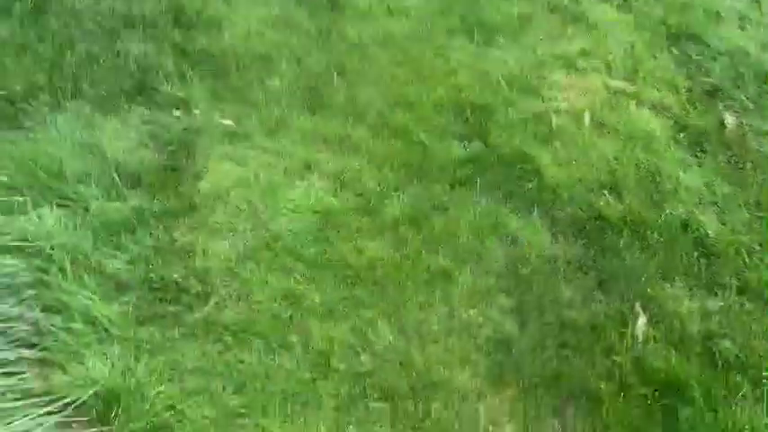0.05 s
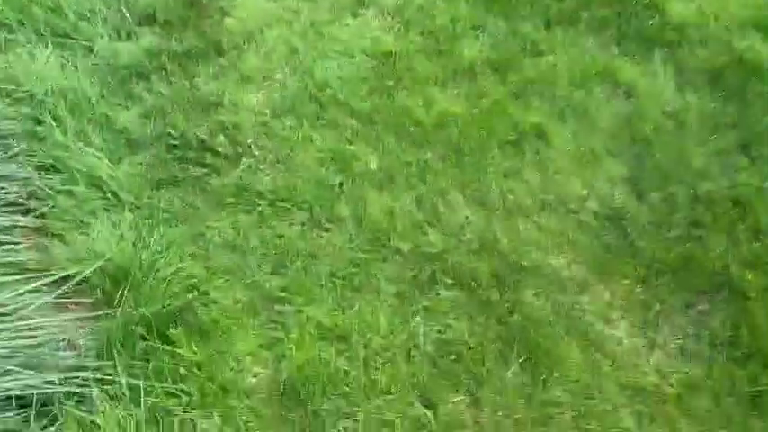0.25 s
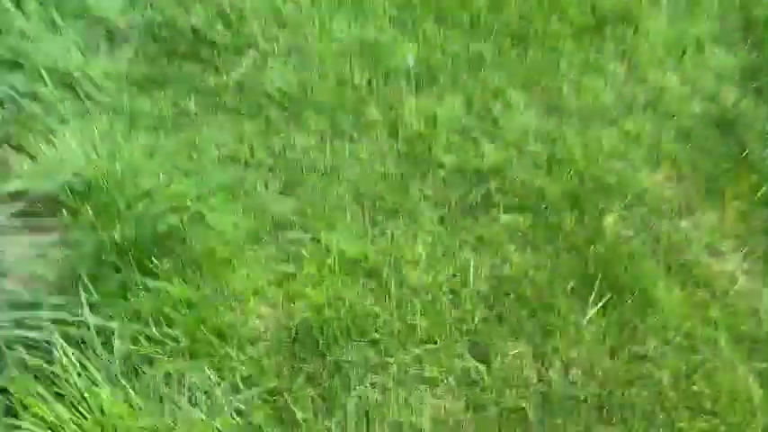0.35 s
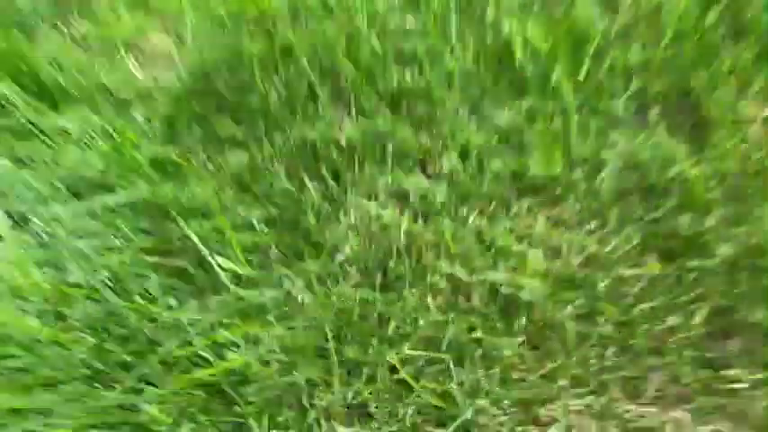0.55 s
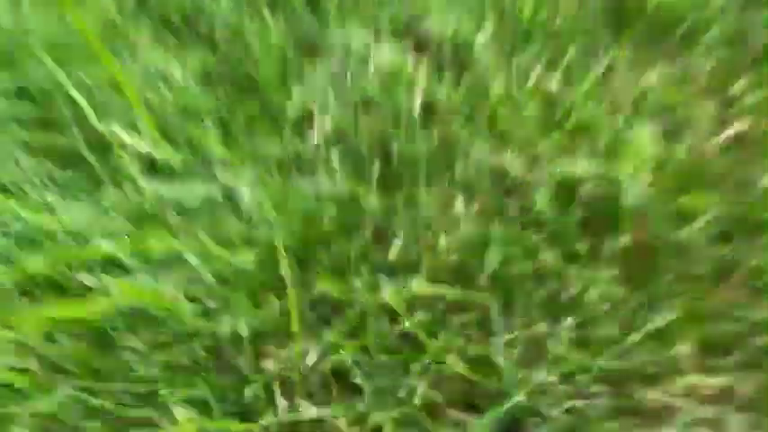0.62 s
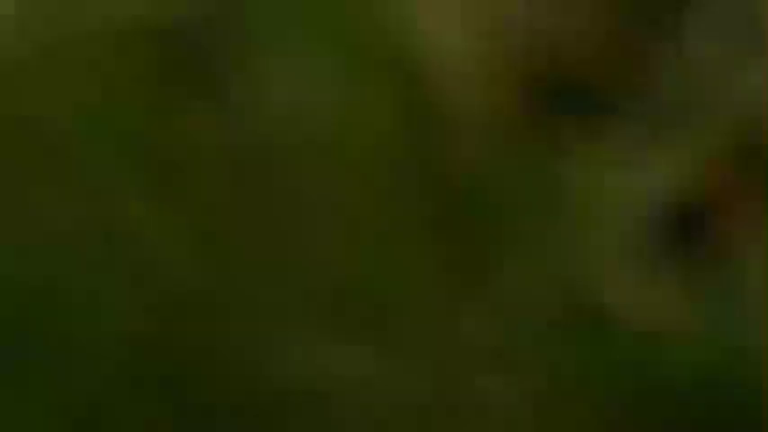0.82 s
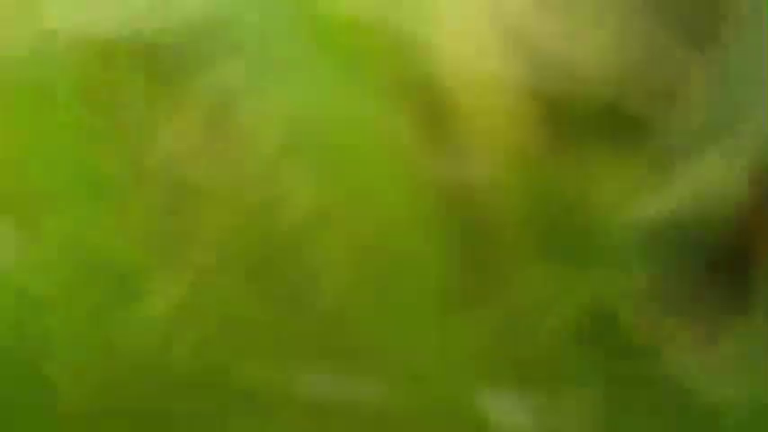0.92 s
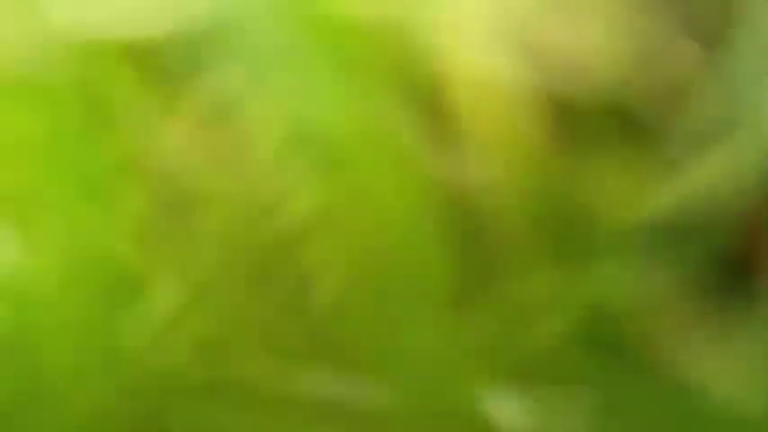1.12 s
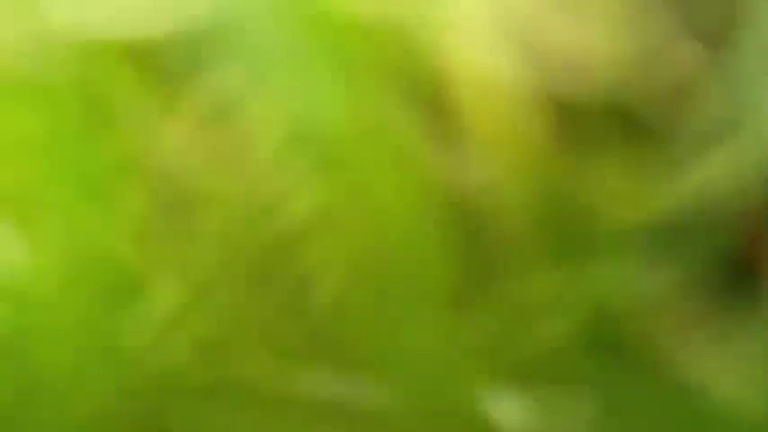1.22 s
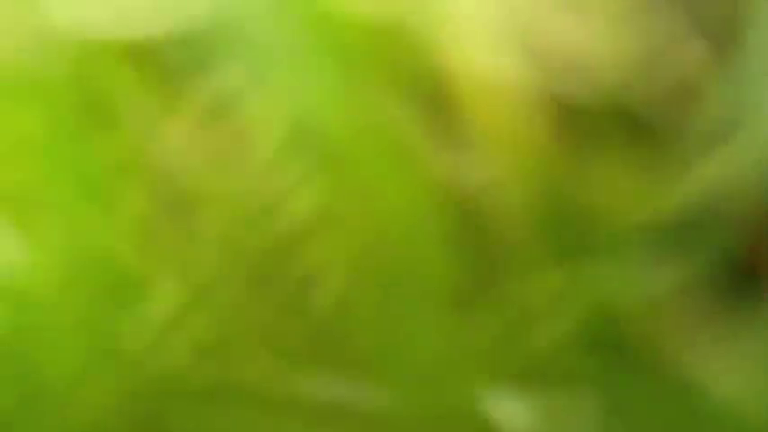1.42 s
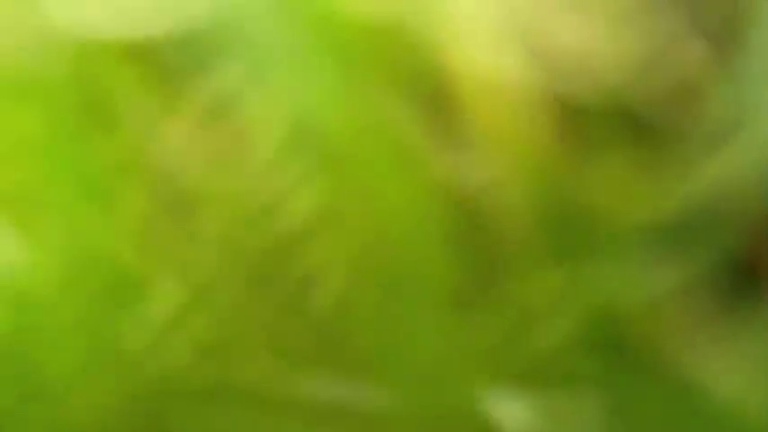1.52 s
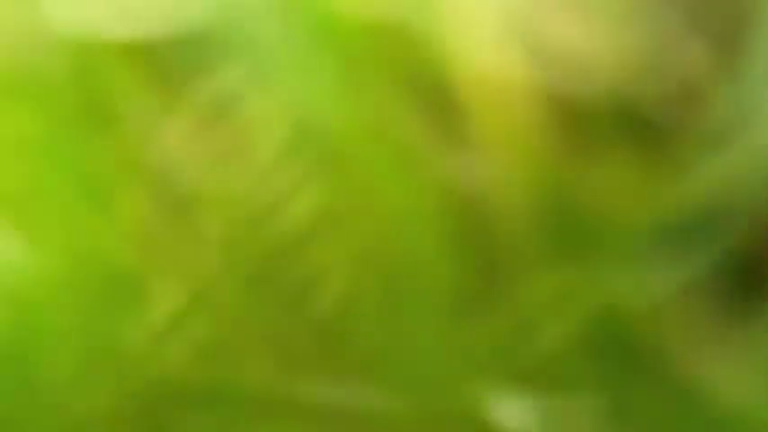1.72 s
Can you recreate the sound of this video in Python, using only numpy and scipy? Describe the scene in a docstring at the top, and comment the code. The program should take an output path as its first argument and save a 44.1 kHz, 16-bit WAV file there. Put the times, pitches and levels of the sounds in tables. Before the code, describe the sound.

A small camera thuds onto a lawn. Low wind buffets its microphone as it falls, then grass swishes, stems crack and blades rustle at the landing. A softer knock and a few faint ticks follow, very close.

```python
"""A small camera falls onto a lawn. Air buffets its two microphone ports, blades swish past the case,
it hits the turf with a thud and a few cracking stems, and the crushed grass rustles out.
Then it lies still while bent blades slip along the case in short ticks."""
import sys
import numpy as np
from scipy import signal
from scipy.fft import rfft, irfft
from scipy.io import wavfile
from scipy.ndimage import uniform_filter1d

SR = 44100
rng = np.random.default_rng(int(sys.argv[2]) if len(sys.argv) > 2 else 0)


def master_out(mix):
    """Clip the mix to full scale and print it as 16-bit PCM to the path in sys.argv[1]."""
    frames = np.transpose(np.atleast_2d(mix))
    ceiling = np.clip(frames, -1, 1)
    pcm = np.round(ceiling * 32767).astype(np.int16)
    wavfile.write(sys.argv[1], SR, pcm)


N = 77175
TIME = np.arange(N) / SR
CUTOFF_HZ = 11400
# buffeting spectrum: (frequency [Hz], relative level [dB])
BUFFET_SPECTRUM = [(25, -13), (36, -6), (50, 2), (72, -3), (110, -10), (170, -21), (300, -40), (600, -54),
                   (3000, -85)]


def from_db(db):
    """Decibels to gain."""
    return 10 ** (np.asarray(db) / 20)


def pan(db):
    """Stereo gains for a left-right level difference."""
    return from_db(np.array([[db], [-db]]) / 2)


def in_time(rows):
    """Control curve at every sample."""
    return np.interp(TIME, *np.transpose(rows))


def at_hz(rows, hz):
    """Interpolate on a log-frequency axis."""
    row_hz, values = np.transpose(rows)
    return np.interp(np.log(hz + 1), np.log(row_hz), values)


def coloured(spectrum, source):
    """Shape a signal pair to a spectrum and to the ports' stereo image; rms 1."""
    # likeness of the ports: (frequency [Hz], correlation [-1..1])
    likeness = [(60, .86), (130, .76), (270, .55), (600, .3), (1200, .05), (2000, .35), (3500, .85),
                (5700, .8), (7200, .85)]
    # port balance: (frequency [Hz], left-right [dB])
    balance = [(200, 0), (900, 0), (4000, 1.5), (7000, -2), (11000, -4)]
    hz = np.arange(N // 2 + 1) * SR / N
    alike = at_hz(likeness, hz)
    band_limit = np.minimum(hz / spectrum[0][0], 1) ** 2 * (hz < CUTOFF_HZ + 600)
    gain = band_limit * from_db(at_hz(spectrum, hz) + at_hz(balance, hz) * [[1], [-1]] / 2)
    mid, side = rfft(source)
    ports = np.sqrt(1 + alike) * mid + np.sqrt(1 - alike) * side * [[1], [-1]]
    out = irfft(gain * ports, N)
    return out / np.sqrt(np.mean(out ** 2) + 1e-20)


def noise(spectrum):
    """Smooth stereo noise."""
    return coloured(spectrum, rng.standard_normal((2, N)))


def grains(spectrum):
    """Tiny contacts of uneven size, bunched into clumps."""
    rate_per_s, spread_db, clump_db, clump_s = 5000, 3, 2, .003
    sizes = from_db(spread_db * np.minimum(rng.exponential(1, N), 4))
    born = rng.random(N) < rate_per_s / SR
    clumps = np.interp(TIME / clump_s, np.arange(N), np.clip(rng.standard_normal(N), -2, 2))
    signs = rng.choice([-1, 1], (2, N))
    return coloured(spectrum, sizes * born * from_db(clump_db * clumps) * signs)


def evened(x, samples):
    """Hold the running rms at 1."""
    return x / np.sqrt(uniform_filter1d(np.mean(x ** 2, axis=0), samples) + 1e-9)


def swell(at_s, db, rise_db_per_s, hold_s, fall_db_per_s):
    """Rise, hold and fall, linear in dB."""
    before_s, after_s = np.maximum(at_s - TIME, 0), np.maximum(TIME - at_s - hold_s, 0)
    return from_db(db - rise_db_per_s * before_s - fall_db_per_s * after_s)


def burst(at_s, db, hold_s, decay_s, rise_s=.0004):
    """Envelope of a slip or snap: fast rise, hold, quick decay."""
    before_s, after_s = np.maximum(at_s - TIME, 0), np.maximum(TIME - at_s - hold_s, 0)
    return from_db(db) * np.exp(-before_s / rise_s - after_s / decay_s)


def air():
    """Buffeting and handling rumble, outdoor hush, and the rush of the fall."""
    # rumble: (time [s], relative level [dB])
    rumble_level = [(0.0, -47), (0.112, -44), (0.14, -50), (0.21, -42), (0.45, -42), (0.53, -48),
                    (0.69, -43), (0.78, -33), (0.988, -48), (1.056, -36), (1.1, -46), (1.238, -44),
                    (1.452, -60), (1.74, -46)]
    # open-air hiss, shut out by the grass: (time [s], level [dB])
    hiss_level = [(.25, -67), (.33, -70.5), (.66, -69.5), (.8, -85)]
    # air spectra: (frequency [Hz], relative level [dB])
    hush_spectrum = [(100, -6), (160, -4), (290, -5), (365, -1), (430, -12), (700, -15), (1100, -19),
                     (2000, -27), (3200, -34), (4700, -29), (5900, -38), (7500, -35), (11000, -39)]
    hiss_spectrum = [(1000, -6), (2000, -2), (4000, -8), (5800, -12), (7500, 1), (11000, -1.5)]
    rush_spectrum = [(400, -7), (900, -3), (1700, -1), (2500, -3), (4000, -13), (5800, -20), (7500, -13),
                     (11000, -15)]
    # rush of the fall: (time [s], level [dB], rise [dB/s], hold [s], fall [dB/s])
    rush_swells = [(.213, -54, 400, .015, 220), (.285, -64, 200, .08, 80)]
    rumble = from_db(in_time(rumble_level) - 1) * evened(noise(BUFFET_SPECTRUM), samples=1800)
    hush = from_db(-55.5) * noise(hush_spectrum)
    hiss = from_db(in_time(hiss_level)) * noise(hiss_spectrum)
    rush = sum(swell(*row) for row in rush_swells) * grains(rush_spectrum)
    return rumble + pan(db=1.8) * (hush + hiss + rush)


def gusts():
    """Low wind gusts at the ports, each throbbing around its own low pitch."""
    # gusts in the fall: (time [s], level [dB], hold [s], pitch [Hz])
    eddies = [(.187, -33.5, .06, 60), (.27, -36, .088, 56), (.412, -34.5, .04, 112), (.458, -34.5, .04, 74),
              (.588, -39.5, .065, 62)]
    band_ratio, edge_db_per_s = 1.45, 700
    out, buffet = np.zeros((2, N)), noise(BUFFET_SPECTRUM)
    for at_s, db, hold_s, hz in eddies:
        band = signal.butter(2, [hz / band_ratio, hz * band_ratio], "band", fs=SR, output="sos")
        throb = evened(signal.sosfilt(band, buffet), samples=900)
        out += swell(at_s, db, edge_db_per_s, hold_s, edge_db_per_s) * throb
    return out


def ticks():
    """Bent blades slip along the case in brief rasps, each with its own damped resonance."""
    # rasp spectrum: (frequency [Hz], relative level [dB])
    rasp_spectrum = [(500, -1), (1300, 0), (2000, -1), (3000, -4), (4200, -4), (5700, -11), (7400, 3),
                     (8800, -1), (11000, -3)]
    # slips: (time [s], drive [dB], hold [s], treble gain [dB], resonance [Hz], resonance gain [dB])
    slips = [(.292, -57, .003, -25, 2800, 14), (.417, -57, .004, -25, 1400, 11),
             (.5367, -61, .003, -25, 4200, 20), (1.0095, -61, .002, -20, 750, 27),
             (1.0335, -36, .004, -8, 3000, 6), (1.204, -61, .003, -20, 850, 24),
             (1.2178, -48, .002, 4, 1100, 14), (1.3134, -42.5, .0028, 0, 1200, 9),
             (1.4398, -46, .0012, 2, 7400, 4), (1.493, -58, .002, 1, 5000, 4),
             (1.6225, -46, .001, -2, 1300, 6), (1.6636, -56, .002, -2, 1400, 4),
             (1.683, -56, .004, -4, 1400, 3), (1.696, -54, .002, 2, 5000, 6),
             (1.729, -47, .0015, -12, 4800, 17), (1.742, -50, .002, -10, 4800, 16)]
    treble_hz = 4500
    rasp = evened(noise(rasp_spectrum), samples=80)
    dull = signal.sosfilt(signal.butter(1, treble_hz, fs=SR, output="sos"), rasp)
    out = np.zeros((2, N))
    for at_s, db, hold_s, treble_db, ring_hz, ring_db in slips:
        slip = burst(at_s, db, hold_s, decay_s=.0007)
        ring = signal.lfilter(*signal.iirpeak(ring_hz, Q=6, fs=SR), slip * rasp + 1e-18)
        out += slip * (dull + from_db(treble_db) * (rasp - dull)) + from_db(ring_db) * ring
    return pan(db=6) * out


def creaking(rubbing):
    """Rubbing plus the narrow case resonances it excites."""
    modes_hz = [510, 820, 1010, 1220, 1570]
    modes = sum(signal.lfilter(*signal.iirpeak(hz, Q=35, fs=SR), rubbing + 1e-18) for hz in modes_hz)
    return rubbing + from_db(8) * modes


def grass():
    """Blade tips swish and brush by, the tuft is crushed, the case skids and rubs, a last blade drags."""
    # friction spectra: (frequency [Hz], relative level [dB])
    swish_spectrum = [(300, -12), (600, -12), (1300, -17), (1550, -1), (1900, 6), (2350, -3), (3100, -18),
                      (5000, -22), (8000, -33), (11000, -35)]
    brush_spectrum = [(250, 2), (520, 9), (800, 0), (1500, -3), (3000, -7), (4500, -7), (6000, -13),
                      (7500, -13), (11000, -18)]
    crush_spectrum = [(200, 6), (450, 9), (900, 3), (1800, 4), (3000, -2.5), (4500, -5), (5700, -7),
                      (7500, -3), (9000, -5), (10500, -2)]
    drag_spectrum = [(900, -20), (2000, -8), (3500, 0), (5000, 0), (8000, -1), (10000, -26)]
    rub_spectrum = [(300, -7), (650, -8), (1000, 6), (1450, -13), (2400, -7), (3100, -28), (4700, -18),
                    (6000, -36)]
    # contact envelopes: (time [s], level [dB], rise [dB/s], hold [s], fall [dB/s])
    swish_swells = [(.692, -31.5, 1100, .004, 1300), (.713, -32.5, 1200, .008, 1200)]
    brush_swell = (.711, -36.5, 700, .012, 450)
    crush_swell = (.75, -29.5, 700, .014, 255)
    skid_swell = (.816, -44, 600, .004, 1800)
    drag_swell = (1.731, -46.5, 4500, .012, 2000)
    rub_swell = (1.235, -55.5, 900, .04, 90)
    swish = sum(swell(*row) for row in swish_swells) * evened(grains(swish_spectrum), samples=350)
    brush = creaking(swell(*brush_swell) * grains(brush_spectrum))
    rustle = (swell(*crush_swell) + swell(*skid_swell)) * evened(grains(crush_spectrum), samples=500)
    drag = swell(*drag_swell) * grains(drag_spectrum)
    rub = swell(*rub_swell) * grains(rub_spectrum)
    return swish + brush + pan(db=4.5) * (rustle + drag) + pan(db=-3) * rub


def thuds():
    """The case knocks and rocks on the turf; each blow sags in pitch as the turf gives way."""
    # blows: (time [s], peak [dB], rise [s], final pitch [Hz], first pitch [Hz])
    blows = [(.7405, -13.5, .0095, 56, 400), (.7775, -24, .004, 110, 480), (.8165, -28, .005, 60, 300),
             (1.0365, -28.5, .003, 120, 540), (1.218, -36, .003, 170, 450)]
    # rocking: (time [s], level [dB])
    rocking_level = [(.67, -72), (.715, -40), (.77, -38), (.83, -42), (.89, -49), (.98, -50), (1.035, -42),
                     (1.09, -52), (1.18, -52), (1.22, -45), (1.29, -50), (1.36, -64), (1.58, -61),
                     (1.70, -53)]
    # rocking spectrum: (frequency [Hz], relative level [dB])
    rocking_spectrum = [(90, 0), (130, 2), (220, 0), (420, -6), (700, -19), (1100, -26), (2500, -40),
                        (5000, -52), (11000, -65)]
    sag_s = .0048
    out = np.zeros(N)
    for at_s, db, rise_s, final_hz, first_hz in blows:
        t = np.maximum(TIME - at_s, 0)
        cycles = final_hz * t + (first_hz - final_hz) * sag_s * (1 - np.exp(-t / sag_s))
        envelope = from_db(db) * t / rise_s * np.exp(1 - t / rise_s)
        out += envelope * np.sin(2 * np.pi * cycles)
    return out + from_db(in_time(rocking_level)) * evened(noise(rocking_spectrum), samples=900)


def cracks():
    """Stems snap under the landing case."""
    # snap spectrum: (frequency [Hz], relative level [dB])
    snap_spectrum = [(500, -3), (1000, -5), (1700, 0), (3000, -4), (4500, -5), (6200, -1), (8500, -5),
                     (10500, 2)]
    # snaps: (time [s], level [dB], hold [s], left-right [dB])
    snaps = [(.7456, -17.3, .0018, 1), (.7516, -19, .0013, 4), (.7544, -24.5, .001, 4),
             (.7628, -18, .0009, 5), (.8195, -39, .001, 3), (.836, -45, .002, 4), (.8595, -49, .001, 4),
             (.872, -51, .0007, 4), (.882, -56, .001, 4)]
    envelope = sum(pan(side_db) * burst(at_s, db, hold_s, decay_s=.0005)
                   for at_s, db, hold_s, side_db in snaps)
    return envelope * evened(noise(snap_spectrum), samples=60)


def scene():
    """All sources at the two ports."""
    return air() + gusts() + thuds() + grass() + cracks() + ticks()


def record(dry):
    """A left-port resonance inverts that side's phase in the treble; both sides are low-passed."""
    port_hz = 8900
    left, right = dry
    turned = 2 * signal.lfilter(*signal.iirnotch(port_hz, Q=8, fs=SR), left) - left
    lowpass = signal.cheby1(10, .5, CUTOFF_HZ, fs=SR, output="sos")
    return signal.sosfilt(lowpass, np.array([turned, right]))


dry = scene()
out = record(dry)
master_out(out)
```